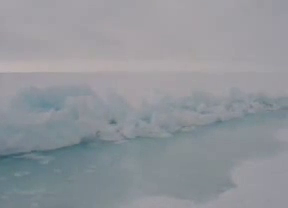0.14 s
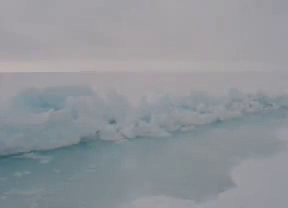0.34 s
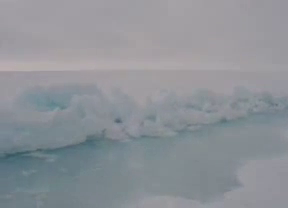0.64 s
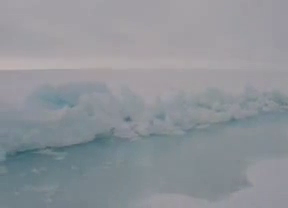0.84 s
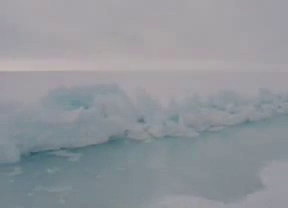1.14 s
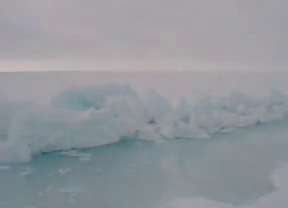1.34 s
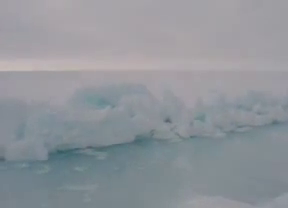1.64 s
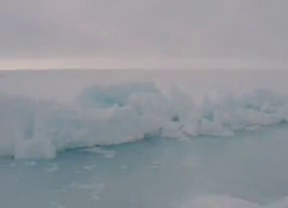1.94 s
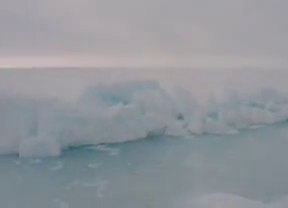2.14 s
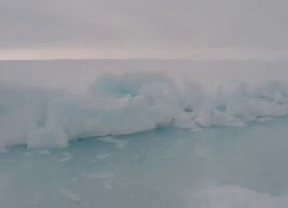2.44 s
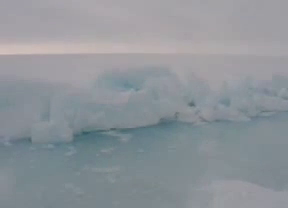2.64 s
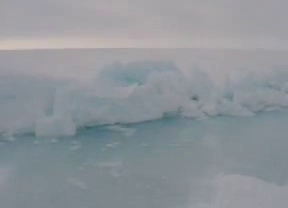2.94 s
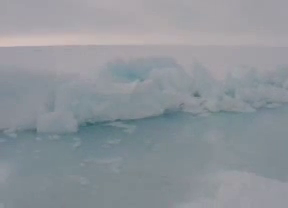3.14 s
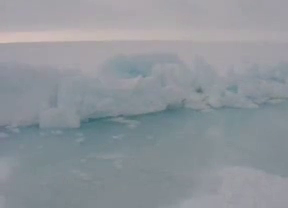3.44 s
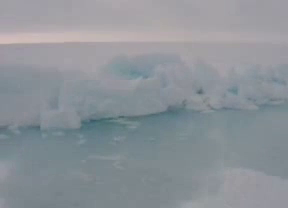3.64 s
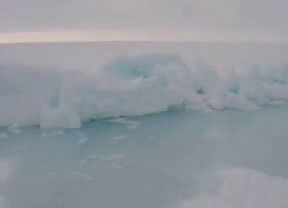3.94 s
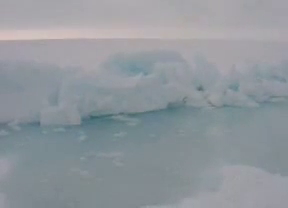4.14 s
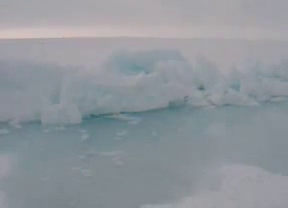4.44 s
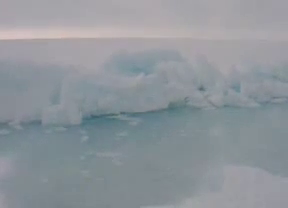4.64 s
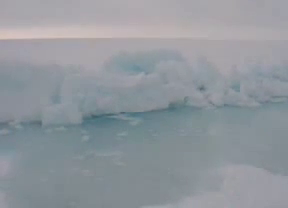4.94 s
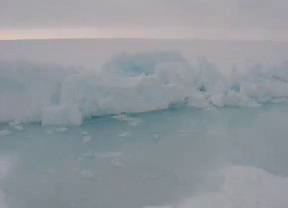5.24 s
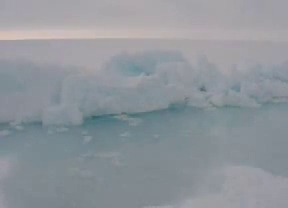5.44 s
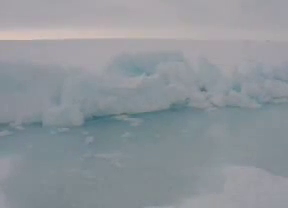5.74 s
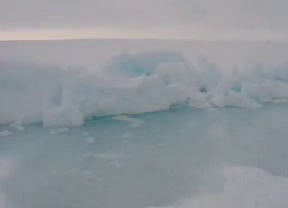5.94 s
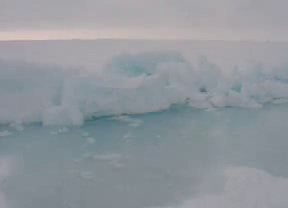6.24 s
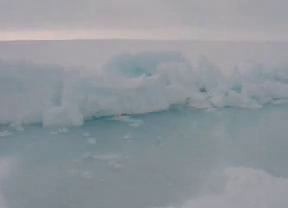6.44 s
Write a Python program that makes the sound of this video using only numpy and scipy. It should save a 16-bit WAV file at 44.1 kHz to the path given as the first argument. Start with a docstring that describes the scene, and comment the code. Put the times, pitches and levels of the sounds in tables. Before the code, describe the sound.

Harsh buzzing scrape of ice against ice, forty-odd cracks a second, with crunches, squeaks and low rumble, finally jamming into a fast dry stutter.

```python
"""Two sea-ice floes press and slide past each other along a ridge of rubble.
From the start the contact sticks and slips in a harsh chatter: noisy cracks and ringing volleys of ticks.
Under it crushed lumps and grit crackle, pieces crunch off, ice squeaks and a deep rumble builds.
Dull thuds follow from 2.1 s and splintering slabs from 3.4 s, both filtered runs of random fractures.
At 5 s the contact jams into a stutter of hard cracks; a low sine squeal grows and two sharp snaps ring out."""
import sys
import numpy as np
from scipy import signal
from scipy.fft import rfft, irfft, next_fast_len
from scipy.io import wavfile

SR = 44100
rng = np.random.default_rng(int(sys.argv[2]) if len(sys.argv) > 2 else 0)


def digitize_waveform(pressure):
    """Quantize a signal to 16-bit integers and store it at the path in sys.argv[1].

    Rows of a 2-D input are taken as channels; values are limited to [-1, 1].
    """
    field = np.atleast_2d(pressure).T
    bounded = np.clip(field, -1, 1)
    quanta = np.round(bounded * 32767).astype(np.int16)
    wavfile.write(sys.argv[1], SR, quanta)


N = 290619
TIME = np.arange(N) / SR


def from_db(db):
    """Decibels to a linear gain."""
    return 10 ** (np.asarray(db) / 20)


def rms_one(x):
    """Scale to an rms of 1."""
    return x / np.sqrt(np.mean(x ** 2) + 1e-20)


def in_time(rows):
    """Each column of a curve, interpolated at every sample."""
    time_s, *columns = np.transpose(rows)
    return [np.interp(TIME, time_s, column) for column in columns]


def add(out, start_s, sound):
    """Mix a short sound in, starting at start_s."""
    i = int(round(start_s * SR))
    part = sound[max(-i, 0):max(N - i, 0)]
    out[max(i, 0):max(i, 0) + len(part)] += part


def coloured(x, spectrum):
    """Shape by a smooth spectrum below 8 kHz, keeping the power of a white input."""
    size = next_fast_len(N + 4096)
    bins_hz = np.fft.rfftfreq(size, 1 / SR)
    hz, db = np.transpose(spectrum)
    gain = from_db(np.interp(np.log(bins_hz + 1), np.log(hz), db))
    gain = rms_one(gain * (bins_hz < 8000))
    return irfft(rfft(x, size) * gain, size)[:N]


def resonance(x, hz, width_hz):
    """Resonance with gain 1 on top, whose centre may move."""
    r = np.exp(-np.pi * width_hz / SR)
    turn = np.exp(2j * np.pi * np.cumsum(np.broadcast_to(hz, N)) / SR)
    # shift the centre down to 0 Hz, smooth, and shift back up
    smooth = signal.lfilter([1 - r], [1, -r], x / turn + 1e-18)
    return 2 * (smooth * turn).real


def drift(rate):
    """Smooth random wander with rms 1, taking a new target rate times a second."""
    knots = rng.standard_normal(8192)
    return rms_one(np.interp(TIME * rate, np.arange(len(knots)), knots))


def fractures(per_s, spread_db):
    """Random tiny snaps of uneven size and either sign; rms 1."""
    sizes = from_db(spread_db * np.minimum(rng.exponential(1, N), 4))
    signs = rng.choice([-1, 1], N)
    return rms_one(sizes * signs * (rng.random(N) < per_s / SR))


def avalanches(rate, clump_db):
    """A gain that comes in clumps of limited size; rms 1."""
    return rms_one(from_db(clump_db * np.clip(drift(rate), -2, 2)))


# how fast the sliding contact sticks and slips: time_s [s], slip_rate [slips per s]
SLIP_RATE = [(0.0, 41.57), (0.11, 37.01), (0.36, 41.66), (0.42, 32.06), (0.67, 46.82), (0.72, 38.54),
             (1.01, 43.3), (1.11, 39.52), (1.15, 46.41), (1.3, 37.59), (1.54, 43.99), (1.59, 38.31),
             (1.93, 54.55), (2.06, 42.83), (2.1, 48.77), (2.23, 40.7), (2.33, 45.45), (2.38, 41.25),
             (2.6, 47.23), (2.69, 41.66), (2.78, 49.86), (2.82, 41.8), (3.14, 47.73), (3.21, 53.4),
             (3.25, 48.87), (3.66, 49.39), (3.7, 61.82), (3.78, 41.12), (3.91, 48.18), (3.99, 45.39),
             (4.19, 57.85), (4.3, 52.94), (4.33, 66.9), (4.36, 44.66), (4.4, 76.98), (4.43, 39.06),
             (4.51, 61.53), (4.55, 35.94), (4.64, 50.36), (4.69, 40.41), (4.81, 55.39), (4.9, 37.61),
             (4.94, 57.93), (5.02, 21.73)]
# pressure on the contact, as slip strength before scatter and layer gains: time_s [s], level_db [dB]
LOAD = [(0.0, -21.5), (0.31, -21), (0.36, -21.5), (0.53, -21), (0.58, -21), (0.63, -18.5), (0.67, -24),
        (0.77, -27), (0.81, -20.5), (1.01, -25.5), (1.15, -20), (1.44, -22.5), (1.59, -19), (1.68, -22.5),
        (1.713, -19.5), (1.76, -22.5), (2.38, -22.5), (2.69, -19.5), (2.78, -21), (2.82, -19.5),
        (4.08, -22), (4.12, -20), (4.3, -19), (4.48, -23), (4.51, -23.5), (4.6, -21.5), (4.64, -21.5),
        (4.74, -23.5), (4.78, -24), (4.81, -25), (4.94, -21), (5.02, -20.5)]
# how the edge is caught: time_s [s], ringing [share of a slip, 0-1], wide_chance [chance of wide pair, 0-1]
EDGE = [(0, 0.54, .1), (.12, 0.6, 0), (.5, 0.52, 0), (.62, 0.7, 0), (.72, 0.1, .1), (.85, 0.5, 0),
        (1.0, 0.2, 0), (1.43, 0.42, 0), (1.55, 0.8, 0), (1.77, 0.28, 0), (1.9, 0.28, 0), (2.17, 0.36, 0),
        (2.27, 0.07, 0), (2.6, 0.43, .45), (3.0, 0.49, .25), (3.55, 0.3, .05), (3.8, 0.4, .2),
        (3.97, 0, .8), (4.1, 0, .1), (4.28, 0.52, 0), (4.45, 0.2, .4), (4.62, 0.46, .1), (4.78, 0, .9),
        (4.9, 0.35, .2), (5.02, 0.5, .1)]
# single hard cracks of the jam, before layer gains:
# start_s [s], level_db [dB], lower_hz [Hz], upper_hz [Hz], ringing [share, 0-1]
CRACKS = [(5.0541, -17.5, 4920, 5980, 0.7), (5.0844, -18.5, 5000, 5930, 0.4),
          (5.125, -18.5, 4880, 6020, 0.4), (5.158, -17, 4620, 6380, 0.7), (5.193, -18, 4700, 6240, 0.6),
          (5.222, -18.5, 4580, 6600, 0.4), (5.2563, -19, 4650, 6370, 0.5), (5.2868, -19.5, 4580, 6500, 0.6),
          (5.3221, -17, 4920, 6130, 0.7), (5.3523, -19.5, 4500, 6440, 0.6), (5.386, -19, 4520, 6400, 0.5),
          (5.418, -16.0, 4870, 6000, 0.8), (5.4425, -18, 4990, 6020, 0.5), (5.4762, -18.5, 5060, 6050, 1),
          (5.5004, -19.5, 4900, 5960.0, 0.6), (5.532, -18.5, 4870, 6230, 0.8),
          (5.5678, -17.5, 4970, 6030.0, 1), (5.6016, -17, 4970, 6120, 0.85),
          (5.6444, -20.5, 4970, 6000, 0.3), (5.6737, -23.5, 4930, 6070.0, 0.1),
          (5.71, -19.5, 4980, 6030, 0.92), (5.7428, -20, 5000, 6000, 0.3), (5.7811, -19, 5070, 6030, 0.5),
          (5.825, -17.5, 4810, 6070, 0.6), (5.862, -19, 4970, 6030, 0.65), (5.898, -17.0, 5000, 5960, 0.5),
          (5.9318, -17, 5020, 6060, 0.9), (5.9801, -15.5, 5060, 6090.0, 0.6), (6.022, -19, 4950, 5940, 0.3),
          (6.0604, -15.5, 5020.0, 6000, 0.7), (6.0967, -17, 5000, 5960, 0.9),
          (6.137, -18, 5060, 5940.0, 0.6), (6.18, -19.5, 4950.0, 5940, 0.5), (6.2257, -19, 4580, 6500, 0.3),
          (6.2666, -22, 4370.0, 5900, 0.2), (6.3118, -18.5, 4676, 6400, 0.3),
          (6.3516, -18, 4980, 5960, 0.4), (6.3888, -15, 4950, 6040, 1), (6.424, -15.5, 4880, 6100, 0.6),
          (6.4697, -20, 4600, 6120, 0.5), (6.517, -19, 4630.0, 6550, 0.4), (6.569, -18, 4650, 6400, 0.3)]
FIRST_SLIP_S, JAM_S = .0059, 5.03
# the edge rings around one of two pairs of notes, by where it is caught: (lower, upper)
CLOSE_PAIR_HZ, WIDE_PAIR_HZ = (5004, 6040), (4590, 6500)


def slip_train(jitter_s, scatter_db, pitch_scatter, stray_scatter):
    """Rows (s, dB, lower Hz, upper Hz, ring share): a chatter as strong as the load, then the jam's cracks."""
    (per_s,), (load_db,), (ringing, wide) = in_time(SLIP_RATE), in_time(LOAD), in_time(EDGE)
    # a slip falls wherever the running count passes a whole number
    turns = np.cumsum(per_s * (TIME > FIRST_SLIP_S)) / SR
    at = np.flatnonzero((np.diff(np.ceil(turns), prepend=0) > 0) & (TIME < JAM_S))
    chance = rng.standard_normal((len(at), 4))
    is_wide = rng.random(len(at)) < wide[at]
    notes_hz = np.where(is_wide[:, None], WIDE_PAIR_HZ, CLOSE_PAIR_HZ)
    notes_hz = notes_hz * (1 + pitch_scatter * chance[:, 2:])
    # where the edge is caught unsteadily, both notes shift from slip to slip
    stray = 1 + stray_scatter * wide[at] * rng.standard_normal(len(at))
    notes_hz = notes_hz * stray[:, None]
    start_s = TIME[at] + jitter_s * chance[:, 0]
    level_db = load_db[at] + scatter_db * chance[:, 1]
    return np.vstack([np.c_[start_s, level_db, notes_hz, ringing[at]], CRACKS])


def stick_slip(slips, length_s, length_spread, lag_s, memory, snap_db, front_db, tail_db, tail_s):
    """Each slip is a snap and a few milliseconds of micro-fractures, trailed by scatter from the rubble."""
    out, pattern = np.zeros(N), 0
    t = (np.arange(2048) - 512) / SR
    memory = np.clip(memory, 0, .8)
    bright = signal.butter(2, [4400, 6400], "band", fs=SR)
    for start_s, level_db, _, _, ringing in slips:
        # the same rough spots break much as they did one slip before
        pattern = memory * pattern + np.sqrt(1 - memory ** 2) * rng.standard_normal(len(t))
        half = length_s / 2 * np.exp(length_spread * rng.standard_normal())
        shape = np.exp(-(t / half) ** 6)
        # brittle fracture spreads its energy widely over pitch, most of it at the start
        spectrum = rfft(shape * pattern)
        evened = irfft(spectrum / (np.abs(spectrum) + 1e-9) ** .6)
        burst = shape * from_db(-front_db * np.clip(t / half, -1, 1)) * evened
        # the first bond to give way adds a snap
        snap = from_db(snap_db) * np.linalg.norm(burst) * rng.standard_normal()
        burst[np.searchsorted(t, -half / 2)] += snap
        # the load sets the energy of the crack in the bright band, less what goes into ringing
        burst *= np.sqrt(1 - np.clip(ringing, 0, .75)) / np.std(signal.lfilter(*bright, burst))
        tail = rms_one((t > 0) * np.exp(-np.abs(t) / tail_s) * rng.standard_normal(len(t)))
        add(out, start_s + t[0] + lag_s, from_db(level_db) * (burst + from_db(tail_db) * tail))
    return out


def recoil(slips, kick_db, hz, width_hz):
    """As the contact lets go, the slab springs back with one even kick through a broad resonance."""
    out = np.zeros(N)
    for start_s, level_db in slips[:, :2]:
        add(out, start_s, from_db([level_db + kick_db]))
    return resonance(out, hz, width_hz)


# how deep the edge bites into the other floe: time_s [s], depth [0-1]
BITE = [(0, 0.1), (.55, 0.35), (1.0, 0.17), (1.6, 0.6), (2.15, 0.57), (2.65, 0.81), (3.95, 0.69),
        (4.25, 0.6), (4.7, .95), (4.9, 1), (5.5, 1), (6.3, 0.75), (6.59, 0.1)]
# resonances of the floe, around which the pitch wanders:
# centre_hz [Hz], width_hz [Hz], shallow_lift_db [dB], deep_lift_db [dB]
ICE_MODES = [(1327, 120, 0, 9), (1795, 66, -11, 9.5), (2266, 77, 7, 9.5), (2760, 100, 9, 8),
             (3403, 130, 3.5, 11.5), (3800, 120, -5.5, 10.5), (4570, 470, 6, 6.5), (5460, 850, 5.5, -13),
             (6420, 160, -1, 3.5)]
# tone of the slips, relative: pitch_hz [Hz], level_db [dB per Hz]
SLIP_COLOUR = [(100, -20.5), (600, -5.5), (1000, -7.5), (1500, -1), (2000, -4), (3000, -4), (4100, -2),
               (5400, 3.5), (6500, 2), (7000, -7.5)]


def ice_body(x, kicks, wander):
    """The ice rings briefly at its modes; the depth of the bite shifts their balance."""
    depth, = in_time(BITE)
    x = coloured(x, SLIP_COLOUR)
    out = x.copy()
    # the contact point shifts, and with it the pitch of each mode
    for hz, width_hz, shallow_db, deep_db in ICE_MODES:
        lift_db = shallow_db + depth * (deep_db - shallow_db)
        moving_hz = hz * (1 + wander * drift(20))
        out += (from_db(lift_db) - 1) * resonance(x + kicks, moving_hz, width_hz)
    return out


# typical full-strength part of a volley, its fade, and the rise time of a tick
RING_HOLD_S, RING_FADE_S, TICK_S = 0.0034, .001, 0.00031
HOLD_SPREAD = .25   # log spread of the hold from volley to volley


def edge_ring(slips, lead_s, uneven_db, stumble):
    """Each slip is a volley of sharp ticks up to about 1 ms apart; their spacing gives the edge's two notes."""
    out, t = np.zeros(N), np.arange(1024) / SR
    for start_s, level_db, lower_hz, upper_hz, ringing in slips:
        # ticks repeat at the difference between the two notes
        starts = np.arange(12)[:, None] / (upper_hz - lower_hz)
        size, slant = rng.standard_normal((2,) + starts.shape)
        hold_s = RING_HOLD_S * np.exp(HOLD_SPREAD * rng.standard_normal())
        fade = np.exp(-np.maximum(starts - hold_s, 0) / RING_FADE_S)
        strength = from_db(uneven_db * size) * fade
        age = np.maximum(t - starts, 0)
        # each tick oscillates midway between the notes, in step with the lower one
        turns = (lower_hz + upper_hz) / 2 * age + lower_hz * starts
        turns = turns + stumble * slant + rng.random()
        ticks = strength * age * np.exp(-age / TICK_S) * np.sin(2 * np.pi * turns)
        volley = rms_one(np.sum(ticks, axis=0))
        add(out, start_s - lead_s, from_db(level_db) * np.sqrt(np.clip(ringing, 0, 1)) * volley)
    return out


# the edge breaks clean in one blow: peak_s [s], peak_db [dB, of the envelope]
SNAPS = [(6.2243, -7), (6.3104, -11)]
SNAP_HZ, SNAP_S = 4900, .00009   # pitch and rise time


def snaps():
    """A clean break is a single hard tick: a sine under a fast rise and decay."""
    out, t = np.zeros(N), np.arange(256) / SR
    for peak_s, peak_db in SNAPS:
        envelope = from_db(peak_db) * t / SNAP_S * np.exp(1 - t / SNAP_S)
        add(out, peak_s - SNAP_S, envelope * np.sin(2 * np.pi * SNAP_HZ * t))
    return out


# a rubbing edge groans, then binds into a clear, wavering squeal; flutter is added to pitch and level:
# time_s [s], pitch_hz [Hz], level_db [dB], roughness [0-1]
SQUEAL = [(5.72, 840, -56, 1), (5.86, 841, -41.5, 0.77), (5.99, 865, -46, .75), (6.13, 867, -40, .75),
          (6.26, 872, -43, .8), (6.36, 895, -39, 0.6), (6.41, 871, -34, 0.42), (6.432, 950, -36, 0.36),
          (6.47, 917, -36.5, 0.32), (6.495, 951, -37, 0.3), (6.55, 910, -36, 0.4), (6.59, 880, -42, 0.81)]


def squeal(waver, rough_db):
    """A tone that flutters in pitch and level while the edge rubs loosely and clears as it binds."""
    hz, level_db, rough = in_time(SQUEAL)
    phase = 2 * np.pi * np.cumsum(hz * (1 + waver * rough * drift(220))) / SR
    level = from_db(level_db + rough_db * rough * drift(120))
    return (TIME > SQUEAL[0][0]) * level * np.sqrt(2) * np.sin(phase)


# short squeaks of ice on ice, before waver: start_s [s], level_db [dB], length_s [s], start_hz [Hz], end_hz [Hz]
SQUEAKS = [(.6, -36, 0.019, 2610, 2440), (0.641, -40, 0.019, 2850, 2790), (0.679, -37, .022, 2450, 2320),
           (0.739, -39, .026, 2470, 2400), (0.856, -34, 0.025, 3250, 3100), (0.886, -44, .035, 2920, 2740),
           (.928, -41, 0.02, 3060, 3170), (.956, -37, .015, 4450, 4440), (1.316, -37, 0.025, 1370, 1345),
           (3.144, -28, 0.0052, 1310, 1260), (4.731, -34, 0.011, 3700, 3550),
           (5.672, -32, 0.0054, 3470, 3420), (6.417, -39, .022, 1230, 1210)]


def squeaks(rows, waver):
    """Smooth faces rub with a brief, wavering tone that glides as the pressure changes."""
    out, wobble = np.zeros(N), drift(300)
    for start_s, level_db, length_s, start_hz, end_hz in rows:
        progress = np.linspace(0, 1, int(length_s * SR) + 8)
        wavering = 1 + waver * wobble[int(start_s * SR):][:len(progress)]
        pitch_hz = (start_hz + progress * (end_hz - start_hz)) * wavering
        swell = np.sqrt(progress * (1 - progress))
        tone = np.sin(2 * np.pi * np.cumsum(pitch_hz) / SR) * swell
        add(out, start_s, from_db(level_db) * rms_one(tone))
    return out


TWITTER_FROM_S, TWITTER_TO_S, TWITTER_DB, TWITTER_S = .66, 1.03, -43.5, .005
TWITTER_HZ = (1400, 3480)   # range of starting pitches


def twitter(count):
    """A smooth patch rasps: rows of tiny squeaks at random pitches that sag slightly."""
    when, pitch, glide = rng.random((count, 3)).T
    start_hz = TWITTER_HZ[0] + pitch * (TWITTER_HZ[1] - TWITTER_HZ[0])
    end_hz = start_hz * (1 - 0.034 * glide)
    start_s = TWITTER_FROM_S + (np.arange(count) + when) / count * (TWITTER_TO_S - TWITTER_FROM_S)
    return [(s, TWITTER_DB, TWITTER_S, a, b) for s, a, b in zip(start_s, start_hz, end_hz)]


# both break tables: level_db sets the energy as if packed into length_s; the fade follows
# pieces breaking off: start_s [s], level_db [dB], length_s [s], centre_hz [Hz]
CRUNCHES = [(.372, -25.5, 0.0025, 880), (.604, -33.5, 0.021, 2220), (.69, -32, 0.017, 1000),
            (1.582, -28.5, 0.0077, 1090), (2.374, -26, 0.0058, 950), (2.52, -32, 0.011, 1100),
            (2.845, -20.5, 0.0075, 5300), (3.0, -28.5, 0.0062, 800), (3.149, -34, 0.032, 1140),
            (3.315, -29.5, 0.053, 1430), (3.318, -24.5, 0.053, 4970), (4.504, -22.5, 0.0035, 940),
            (4.618, -31, 0.0079, 880), (5.47, -27.5, 0.0069, 1290), (6.55, -29, 0.038, 3040)]
# dull thuds of the floes: start_s [s], level_db [dB], length_s [s], centre_hz [Hz]
THUDS = [(2.118, -33, 0.01, 115), (2.875, -41, 0.029, 90), (3.72, -40, 0.029, 66), (3.9, -42, 0.036, 62),
         (4.7, -43, 0.036, 111), (4.745, -36.5, 0.015, 155), (4.96, -41, 0.12, 110)]


def breaks(rows, relative_width, fade_s, clump_db=0):
    """A piece gives way in a band-filtered run of fractures; each has its own length and pitch."""
    out = np.zeros(N)
    grains = fractures(per_s=3700, spread_db=-5.0) * avalanches(300, clump_db)
    for start_s, level_db, length_s, hz in rows:
        t = np.arange(int((length_s + 5 * fade_s) * SR)) / SR
        run = grains.take(int(start_s * SR) + np.arange(len(t)), mode="wrap")
        run = run * np.exp(-np.maximum(t - length_s, 0) / fade_s)
        edges = np.clip([hz / (1 + relative_width), hz * (1 + relative_width)], 20, SR * .45)
        band = signal.butter(2, edges, "band", fs=SR, output="sos")
        sound = rms_one(signal.sosfilt(band, run))
        add(out, start_s, from_db(level_db) * sound * np.sqrt(length_s / t[-1]))
    return out


def sticking(slips, hush_db):
    """Grit is crushed just after each slip and falls quiet as the contact sticks again; rms 1."""
    times = np.sort(slips[:, 0])
    stuck = np.interp(TIME, times, np.arange(len(times))) % 1
    return rms_one(from_db(-hush_db * stuck ** 2))


# fine grit crushed in the contact, before its flow and gain: time_s [s], level_db [dB]
GRIT = [(0, -36.5), (.52, -38), (.7, -31), (.97, -30.5), (1.25, -34.5), (2.5, -33.5), (3.05, -34.5),
        (3.2, -33), (3.75, -33.5), (4.4, -32.5), (5.15, -31), (5.5, -32.5), (6.59, -30.5)]
# coarse lumps crushed in the ridge: time_s [s], level_db [dB]
LUMPS = [(0, -38.5), (.55, -38), (.7, -36.5), (2.0, -38), (3.3, -37), (4.25, -38), (5.1, -38),
         (6.59, -36.5)]
# tones of grit, lumps and slabs, relative: pitch_hz [Hz], level_db [dB per Hz]
GRIT_COLOUR = [(600, -27), (1700, -6), (2500, -0.5), (3000, 3), (3500, 3), (4300, -1.5), (5100, 5),
               (5500, 4), (5900, 5.5), (6300, -3), (7000, -3.5)]
LUMP_COLOUR = [(100, -15), (215, -6.5), (275, 1.5), (320, 1.5), (380, -2.5), (520, -0.5), (660, -5.5),
               (850, -1.5), (1030, -5), (1350, -1), (1900, -5), (2600, -9), (5000, -32)]
SLAB_COLOUR = [(300, -13), (480, -3), (950, -3), (1250, 2), (1900, 0.5), (2400, -3), (3500, -9.5)]
SLAB_DB, SLAB_FROM_S = -35, 3.43   # level reached at the very end, and where the slabs start


def rubble(grit_flow, grit_gain_db, lump_clump_db, grit_clump_db, slab_clump_db):
    """Lumps, grit and, ever harder towards the end, trapped slabs are crushed in little avalanches."""
    (grit_db,), (lumps_db,) = in_time(GRIT), in_time(LUMPS)
    squeeze = np.interp(TIME, [SLAB_FROM_S, TIME[-1]], [0, 1])
    lumps = coloured(fractures(per_s=3500, spread_db=0.5) * avalanches(110, lump_clump_db), LUMP_COLOUR)
    grit = coloured(fractures(per_s=7000, spread_db=3.5) * avalanches(250, grit_clump_db), GRIT_COLOUR)
    slabs = coloured(fractures(per_s=2500, spread_db=-0.5) * avalanches(120, slab_clump_db), SLAB_COLOUR)
    crush = from_db(lumps_db) * lumps
    crush += from_db(grit_db + grit_gain_db) * grit_flow * grit
    return crush + from_db(SLAB_DB) * squeeze * slabs


# tone of the deep rumble, relative: pitch_hz [Hz], level_db [dB per Hz]
RUMBLE_COLOUR = [(15, 12.5), (40, -10), (72, 2.5), (110, -1), (175, 4), (230, -3.5), (500, -27),
                 (2000, -62)]
RUMBLE_START_DB, RUMBLE_FULL_DB, RUMBLE_BUILD_S = -47.5, -46, 4.9


def deep_rumble():
    """Low shaped noise that builds slightly as the floes get moving."""
    level_db = np.interp(TIME, [0, RUMBLE_BUILD_S], [RUMBLE_START_DB, RUMBLE_FULL_DB])
    return from_db(level_db) * coloured(rng.standard_normal(N), RUMBLE_COLOUR)


SLIP_CRACK_DB, SLIP_RING_DB = -24.5, -9.5   # gains of the broad crack and of the ring of the edge


def scene():
    """Mix the grinding contact, its rubble, the rubbing tones and the rumble to mono."""
    slips = slip_train(jitter_s=.0002, scatter_db=.5, pitch_scatter=0.004, stray_scatter=0.031)
    cracks = stick_slip(slips, length_s=0.00471, length_spread=.12, lag_s=.0004, memory=0.51,
                        snap_db=-15, front_db=1.0, tail_db=-6.0, tail_s=0.005)
    kicks = recoil(slips, kick_db=42, hz=2930, width_hz=900)
    ring = edge_ring(slips, lead_s=.002, uneven_db=1.5, stumble=0.024)
    contact = from_db(SLIP_CRACK_DB) * ice_body(cracks, kicks, wander=0.02)
    contact += from_db(SLIP_RING_DB) * ring + snaps()
    rubbing = squeaks(SQUEAKS + twitter(count=190), waver=0.009) + squeal(waver=0.08, rough_db=4.4)
    pieces = breaks(CRUNCHES, relative_width=1.41, fade_s=0.0019, clump_db=1.5)
    pieces += breaks(THUDS, relative_width=1.06, fade_s=0.017)
    crush = rubble(sticking(slips, hush_db=6.0), grit_gain_db=-3.0,
                   lump_clump_db=1.5, grit_clump_db=4.0, slab_clump_db=5.0)
    return (contact + rubbing + pieces + crush + deep_rumble())[None]


CUTOFF_HZ = 6800


def record(dry):
    """A steep low-pass cuts the top."""
    low_pass = signal.ellip(8, .3, 66, CUTOFF_HZ, fs=SR, output="sos")
    return signal.sosfilt(low_pass, dry)


dry = scene()
out = record(dry)
digitize_waveform(out)
```